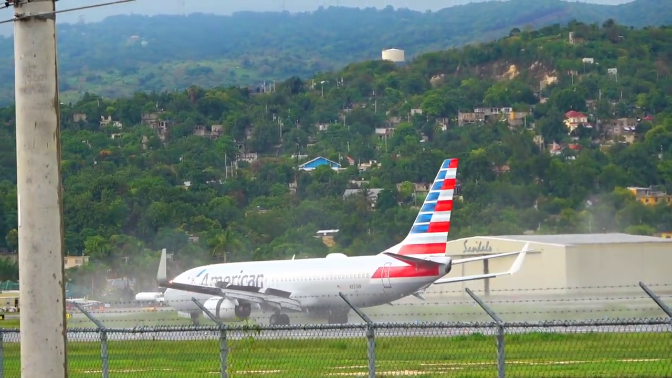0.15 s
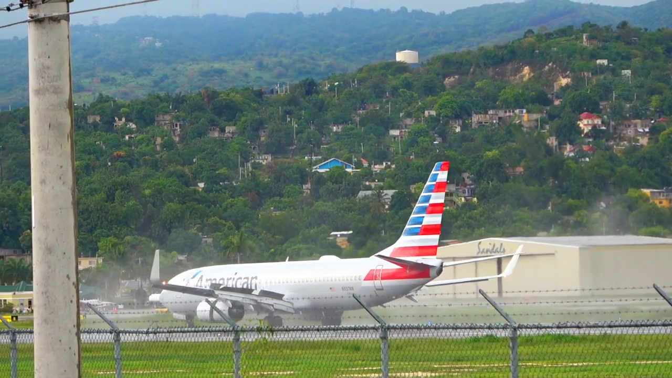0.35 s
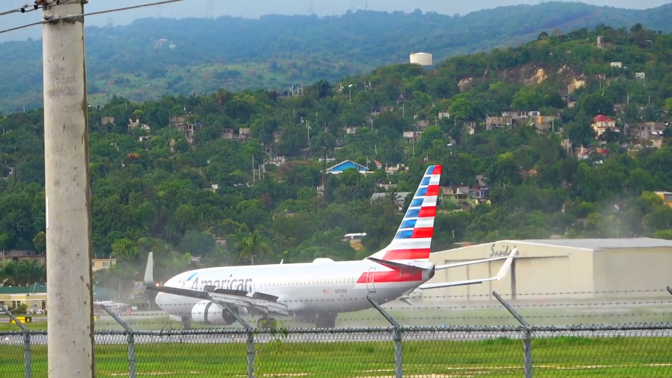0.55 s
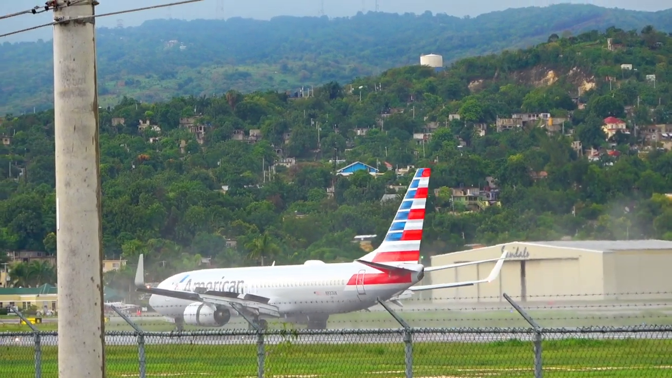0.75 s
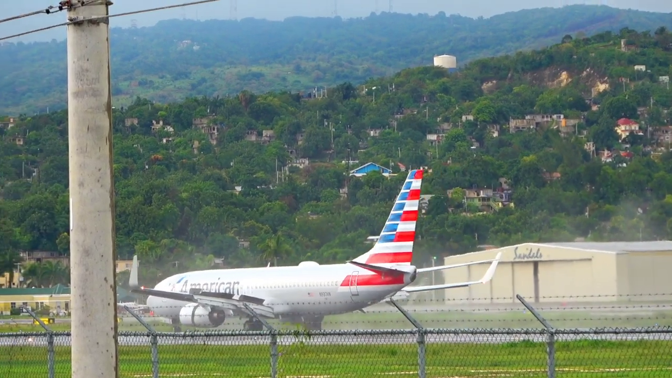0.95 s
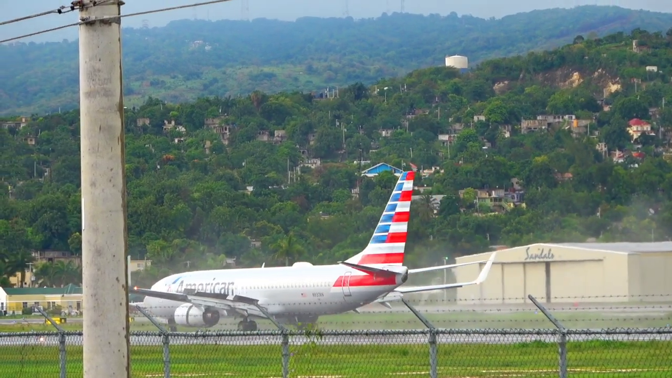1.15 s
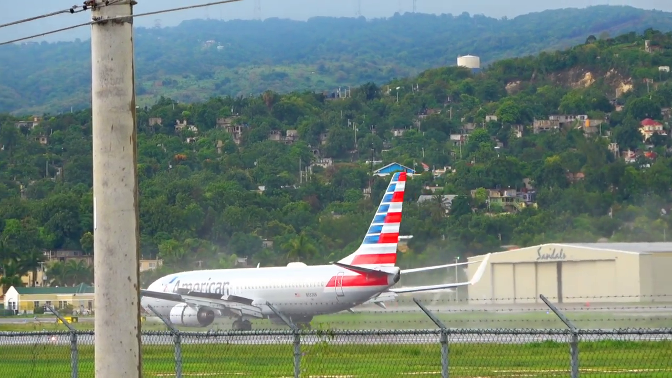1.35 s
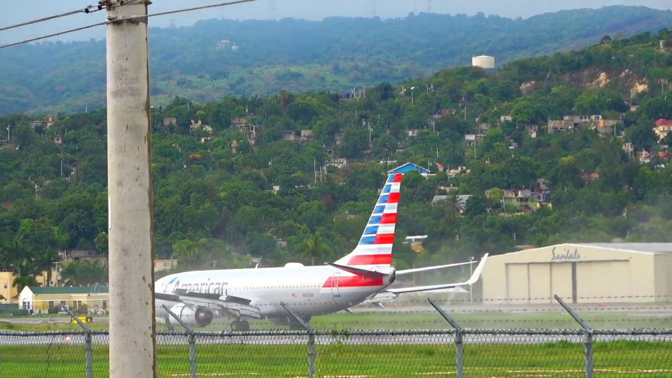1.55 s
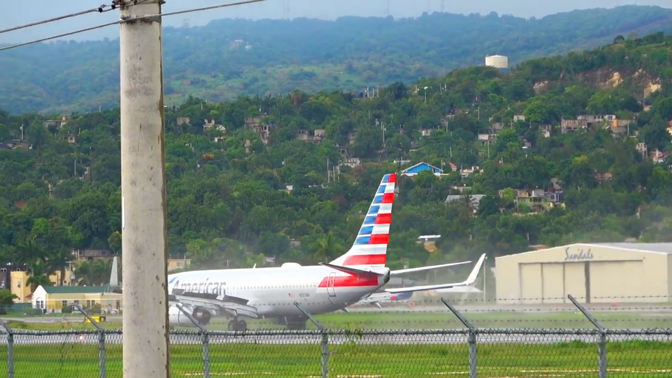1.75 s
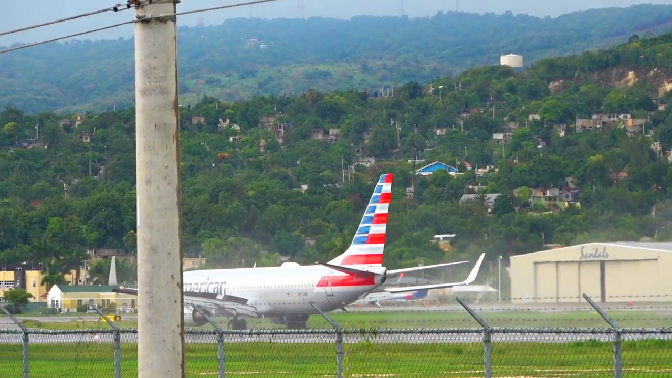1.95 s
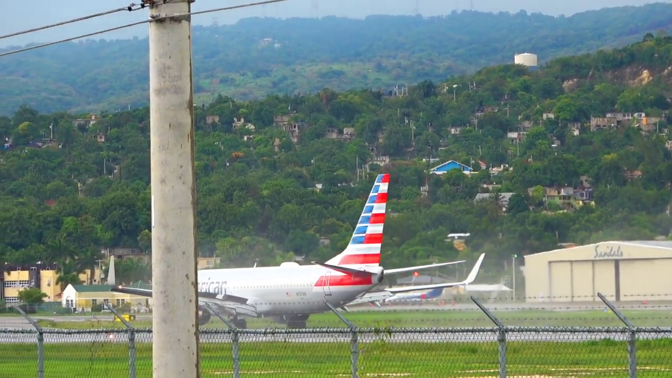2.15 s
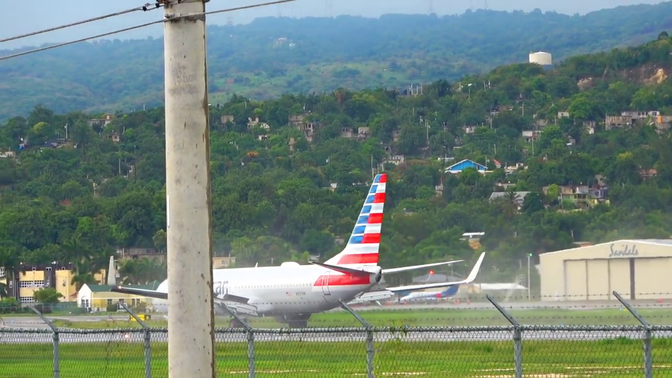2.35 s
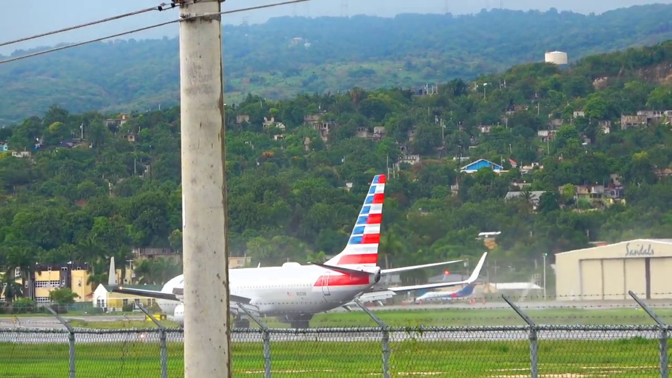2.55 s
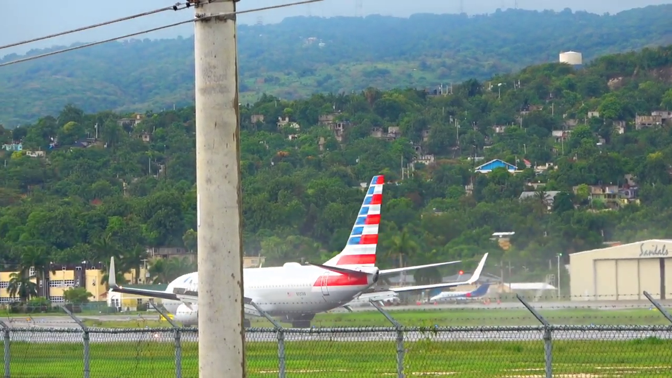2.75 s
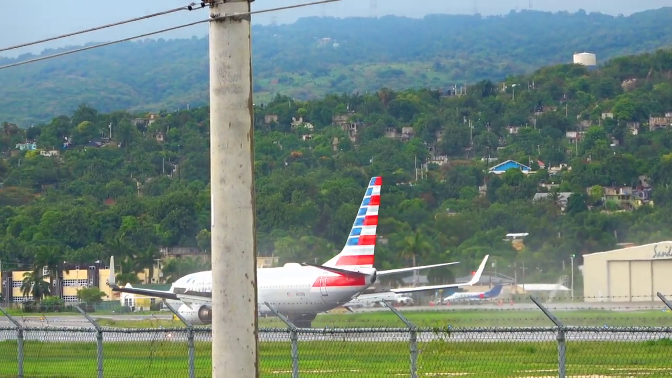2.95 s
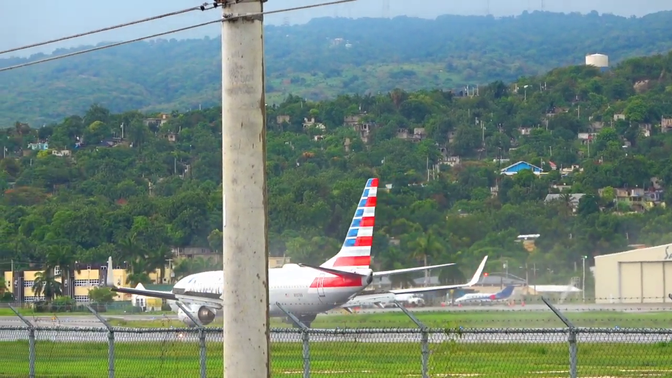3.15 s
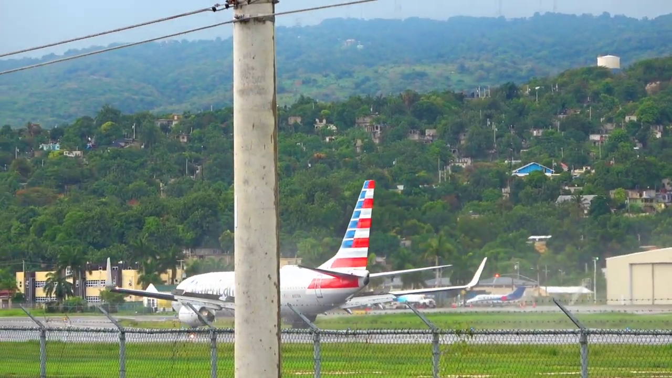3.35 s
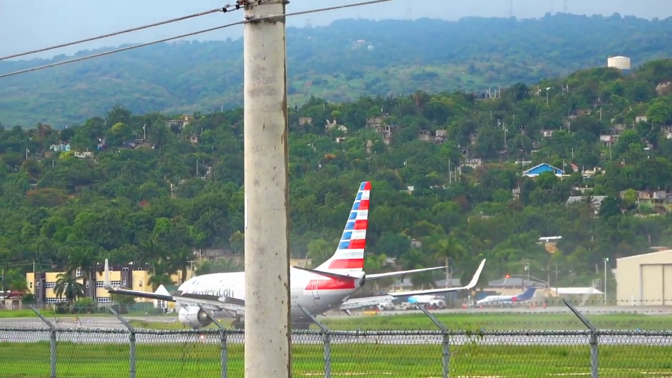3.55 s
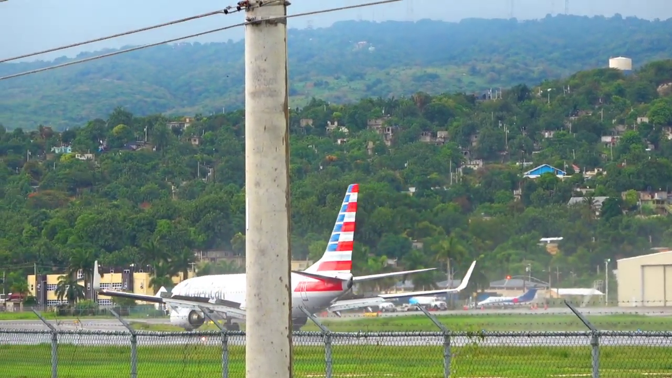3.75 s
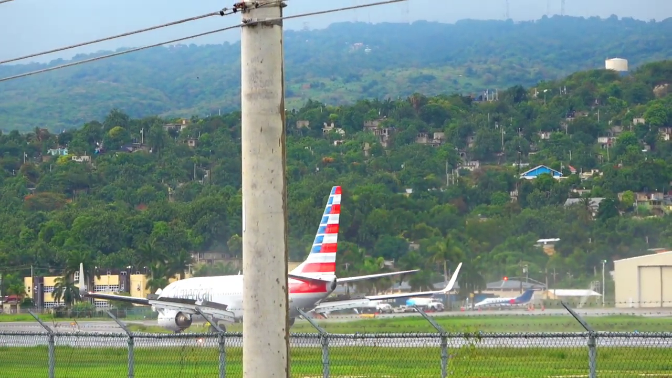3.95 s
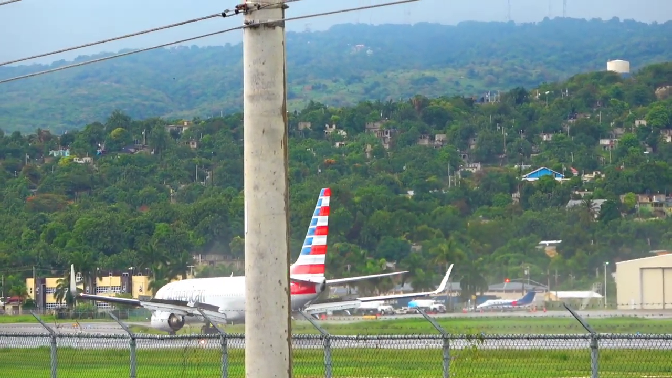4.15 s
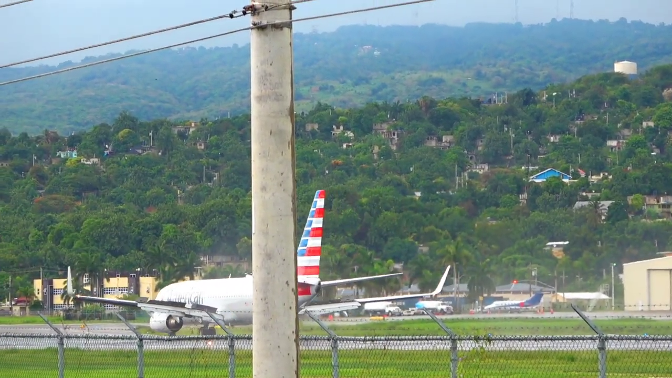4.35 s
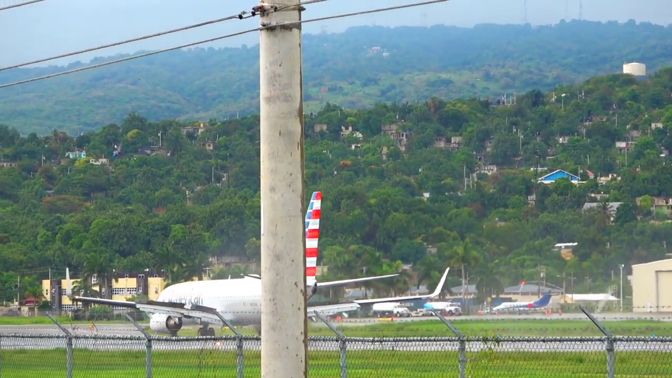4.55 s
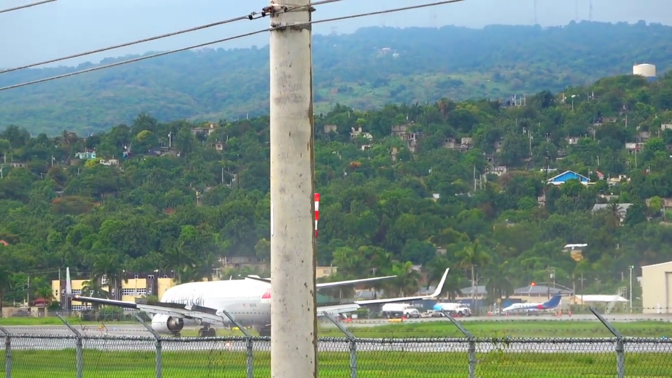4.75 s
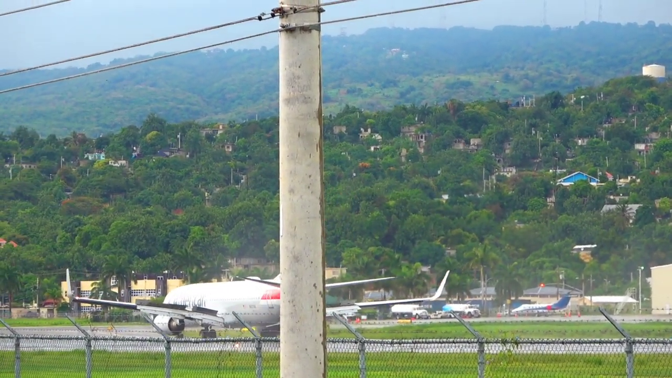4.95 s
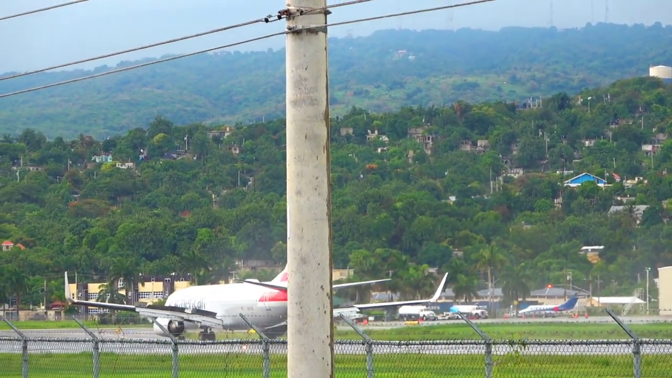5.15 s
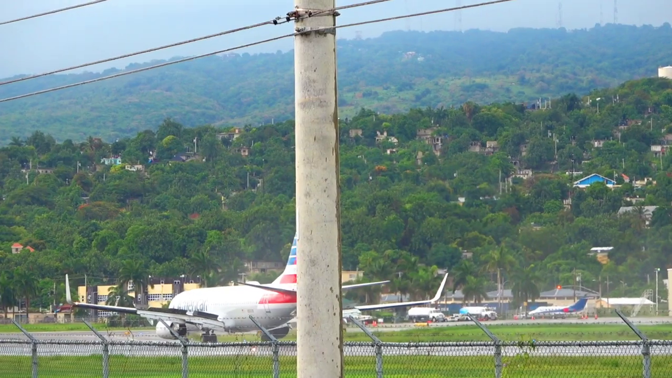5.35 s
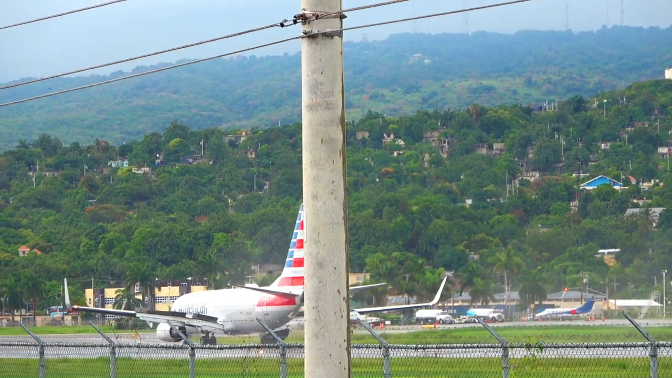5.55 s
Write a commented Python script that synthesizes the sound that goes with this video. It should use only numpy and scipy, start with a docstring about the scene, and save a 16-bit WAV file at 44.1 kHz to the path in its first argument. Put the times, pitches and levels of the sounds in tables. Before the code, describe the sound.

Distant, wide-open jet exhaust noise, loudest at the start: deep rumble, hollow mid roar and airy hiss with a trace of spray. After about two seconds it weakens, swelling and wavering, while thin engine tones glide downward. Near the end brief hissy flares surface over the remaining rumble. An outdoor handheld-style microphone picks up one small click and four muffled bumps; no echo, near-central image.

```python
"""A jet airliner rolls away down a wet runway in reverse thrust, heard across grass from beyond the fence.
Its exhaust is six bands of turbulent noise, hollowed near 450 Hz by the ground reflection, that fade as the
engines spool down; moving air lifts or holds back parts of it. Blade tones sink within the fading hiss, and
late bursts of narrow-band noise flare up. Close by, the microphone takes one tiny tick and four soft bumps,
damped modes of its housing, over the steady noise of an open field and a faint even self-noise."""
import sys
import numpy as np
from scipy import signal
from scipy.fft import rfft, irfft
from scipy.io import wavfile
from scipy.ndimage import uniform_filter1d

SR = 44100
rng = np.random.default_rng(int(sys.argv[2]) if len(sys.argv) > 2 else 0)


def dump(signal):
    """Clip the signal to [-1, 1] and save it as 16-bit WAV at the path in sys.argv[1]."""
    limited = np.clip(np.atleast_2d(signal).T, -1, 1)
    pcm = np.round(limited * 32767).astype(np.int16)
    wavfile.write(sys.argv[1], SR, pcm)


N = 251370
TIME = np.arange(N) / SR   # s
FREQUENCY = np.fft.rfftfreq(N, 1 / SR)   # Hz
OCTAVE = np.log2(np.maximum(FREQUENCY, 1))   # octaves above 1 Hz

# Steady background of the open airfield: frequency_hz, density_db (per Hz, relative)
FIELD_SPECTRUM = [(20, -19), (35, 0.5), (60, 2.5), (130, -4.5), (250, -4), (380, -5), (450, -11.5),
                  (590, -2.5), (680, -10), (1200, -22.5), (2000, -32), (2900, -24), (4000, -30)]
# The microphone's own noise: frequency_hz, density_db (per Hz, relative)
SELF_NOISE_SPECTRUM = [(100, -2.5), (5000, 2.5), (8000, 3), (11000, 5), (15000, 3), (16000, -2)]
# Tiny sharp tick: start_s, level_db (before its envelope)
TICK_EVENT = (1.4894, -24.5)
# Colour of the tick: frequency_hz, density_db (per Hz, relative)
TICK_SPECTRUM = [(4000, -2), (5500, 1.5), (6600, 3), (8000, -6), (10200, -9), (13000, -13), (14500, -27)]
# Soft bumps on the housing: start_s, level_db (before the low-pass), contact_hz, pitch_ratio
BUMP_EVENTS = [(2.4927, -14.5, 300, 1.0), (2.9655, -20, 300, .8), (4.8114, -19.5, 560, 1.5),
               (5.1210, -19.5, 1250, 1.06)]
# Modes of the housing: frequency_hz (before pitch_ratio), level_db, t60_s
HOUSING_MODES = [(185, -3.5, .042), (700, 3.5, .0062), (240, -7, .032), (1250, -8, .004)]
# Stereo width of the far turbulence: frequency_hz, side_minus_mid_db
STEREO_WIDTH = [(30, -24), (100, -26), (280, -40.5), (480, -15.5), (1000, -27.5), (2400, -20), (4400, -36),
                (7000, -16), (10000, -2.5), (16000, -10.5)]
# Late bursts of banded hiss: centre_s, half_length_s (to 1/e), level_db
FLARE_BURSTS = [(4.91, .065, -56.5), (5.005, .05, -53.5), (5.12, .07, -57)]
# Bands in which the hiss flares: centre_hz, width_hz, level_db (relative)
FLARE_HISS_BANDS = [(1900, 120, 0), (2260, 170, 1), (2860, 70, 1), (3050, 45, -2), (3320, 70, -3),
                    (3560, 70, -6), (3870, 80, -4), (4060, 50, -5), (4350, 260, -6)]
# Broadband hiss of the fan intakes: frequency_hz, density_db (per Hz, relative)
INTAKE_SPECTRUM = [(3000, -12.5), (4300, -1), (5200, -10.5), (6300, -9.5), (7300, -14.5), (8200, -16.5)]
# Unequal fan speeds and a fainter tone above: ratio (to the blade tone), level_db (relative)
FAN_TONE_RATIOS = [(.998, 0), (1.011, -4), (1.048, -7)]
# The fans' tone comes and goes as the airliner rolls on: time_s, level_db
FAN_LEVEL_CURVE = [(0, -69), (2.6, -73), (2.95, -66.5), (3.3, -67), (3.55, -70), (3.8, -68.5), (4.0, -63.5),
                   (4.15, -64), (4.25, -68.5), (4.6, -69.5), (4.8, -72), (5.1, -73), (5.4, -71), (5.7, -76)]
# Level of the turbine's tone: time_s, level_db
TURBINE_LEVEL_CURVE = [(0, -76), (3.65, -81), (3.82, -75), (4.0, -83), (4.8, -85), (5.0, -79), (5.35, -78),
                       (5.7, -83)]
# Colours of the exhaust's layers, low to high: frequency_hz, density_db (per Hz, relative)
RUMBLE_SPECTRUM = [(20, -32.5), (40, -27), (60, -8), (85, -4.5), (115, 0), (150, 1), (195, -2.5),
                   (235, -17), (300, -22)]
BUFFET_SPECTRUM = [(150, -30.5), (205, -1), (245, 1.5), (280, 3), (315, -3), (360, -10), (405, -31.5),
                   (445, -43)]   # before the shift in pitch
ROAR_SPECTRUM = [(250, -24), (360, 3.5), (445, -9), (510, -3), (560, 0.5), (650, -3.5), (790, 0.5),
                 (900, -2), (1030, 1), (1270, -1), (1450, -8), (2000, -24.5), (3200, -41.5)]
RUSH_SPECTRUM = [(900, -38.5), (1250, -3), (1450, 3.5), (1750, 3.5), (2050, 0.5), (2400, -3), (2750, -9),
                 (3300, -29)]
HISS_SPECTRUM = [(1800, -16), (2550, -5), (2900, 2.5), (3300, -1.5), (4000, -0.5), (4700, -3.5),
                 (5400, -11.5), (6800, -14.5), (8000, -32)]
SPRAY_SPECTRUM = [(4000, -3.5), (5400, 8), (6800, -3), (8000, -7.5), (9200, -18), (11000, -26.5),
                  (15000, -39)]
# Moving air favours or holds back part of the exhaust's sound:
# centre_s, half_length_s (to 1/e), gain_db (before flutter), centre_hz, reach_octaves (either side, to 1/e)
AIR_SWELLS = [(0.006, 0.077, 2.5, 180, 11), (0.204, 0.13, 2.5, 1500, 1.8), (0.506, .1, -1, 1800, 1.8),
              (0.633, 0.045, 9.5, 200, 0.67), (0.905, 0.026, 7.5, 120, 0.86), (1.06, 0.094, -7, 116, 0.56),
              (1.1, 0.0088, 4, 220, 1.1), (1.37, .13, -5, 413, 0.34), (1.465, 0.045, 7.5, 1660, 0.27),
              (1.66, 0.2, 1.5, 3000, 0.75), (2.002, 0.79, 3, 1120, 1.52), (1.98, 0.032, 1.5, 1900, 0.44),
              (1.934, 0.29, 6, 185, 0.34), (2.666, 0.33, 9, 342, 0.73), (3.3, 0.22, 4.5, 257, 0.28),
              (3.382, 0.38, 6.5, 634, 0.53), (3.4, 0.35, 3, 6000, 0.88), (3.452, 0.61, 2, 2060, 0.93),
              (3.76, 0.026, 10, 170, 0.71), (3.946, 0.32, 14, 259, 0.37), (4.06, 0.04, 3.5, 1800, 0.89),
              (4.1, .1, 4.5, 530, 0.34), (4.45, 0.28, -1.5, 2300, 2.1), (4.986, 0.14, 3.5, 900, 0.88),
              (4.98, .06, 6, 265, .4), (5.0, 0.23, 4.5, 3280, 0.74)]

# The throttles close and the fans coast from full reverse towards idle.
THROTTLE_BACK_S, SPOOL_DOWN_S = 1.6, 2.0
FAN_FULL_HZ, FAN_IDLE_HZ = 5860, 3400   # blade tone at those two speeds
TURBINE_HZ, TURBINE_SAG_HZ_PER_S = 7735, 219
WHINE_FLUTTER_DB, FLARE_FLICKER_DB = 2.0, 2.5   # rms
INTAKE_DB = -67.5
BUFFET_RATIO, BUFFET_POWER = 1.03, .35   # pitch ratio at full reverse; power of fan speed by which it sinks
SWELL_FLUTTER, SWELL_FLUTTER_PER_S = .1, 16   # rms share of a swell's dB; rate
CUTOFF_HZ = 15400


def from_db(db):
    """Amplitude is ten to the power of the level over twenty."""
    return 10 ** (np.asarray(db) / 20)


def rms_one(x):
    """Dividing by the root mean square gives unit power."""
    return x / np.sqrt(np.mean(x ** 2) + 1e-20)


def in_time(rows):
    """Linear interpolation joins rows of time and value."""
    return np.interp(TIME, *np.transpose(rows))


def hump(x, centre, width):
    """A Gaussian bell of height 1 falls to 1/e at width from its centre."""
    return np.exp(-((x - centre) / width) ** 2)


def colour(x, points):
    """Spectral shaping: dB joined along log frequency, falling 36 dB per octave faster beyond the ends."""
    hz, db = np.transpose(points)
    log_hz = np.log2(hz)
    beyond = np.abs(OCTAVE - np.clip(OCTAVE, log_hz[0], log_hz[-1]))
    gain_db = np.interp(OCTAVE, log_hz, db) - 36 * beyond
    return irfft(rfft(x) * from_db(gain_db), N)


def drift(rate):
    """Low-pass noise of unit rms: a random change about rate times a second."""
    noise = rfft(rng.standard_normal(N))
    return rms_one(irfft(noise / (1 + (FREQUENCY / rate) ** 2), N))


def pan(x, left_db):
    """An interchannel level difference leans a sound to the left."""
    return x * from_db(np.array([[.5], [-.5]]) * left_db)


def background(spectrum, level_db, spread):
    """Stationary noise: channels share one part, and spread weights the part each has to itself."""
    noise = rng.standard_normal(N) + spread * rng.standard_normal((2, N))
    return from_db(level_db) * rms_one(colour(noise, spectrum))


def self_noise():
    """The microphone's own noise is a stationary random process, heard as faint even hiss."""
    return background(SELF_NOISE_SPECTRUM, level_db=-76.5, spread=.3)


def open_field():
    """The open airfield is a steady diffuse noise with most of its power at low frequency."""
    return pan(background(FIELD_SPECTRUM, level_db=-45.5, spread=0.18), left_db=-2.0)


def tick(decay_s):
    """An impulsive contact: high-frequency noise under a linear rise and exponential decay."""
    start_s, level_db = TICK_EVENT
    age = np.maximum(TIME - start_s, 0) / decay_s
    crack = rms_one(colour(rng.standard_normal(N), TICK_SPECTRUM))
    return from_db(level_db) * age * np.exp(-age) * crack


def bumps():
    """Modal decay: each soft contact rings the damped housing, and its stiffness sets a low-pass."""
    out = np.zeros(N)
    for start_s, level_db, contact_hz, pitch in BUMP_EVENTS:
        age = np.maximum(TIME - start_s, 0)
        ring = np.zeros(N)
        for k, (hz, db, t60_s) in enumerate(HOUSING_MODES):
            envelope = from_db(db - 60 * age / t60_s)
            ring += (-1) ** k * envelope * np.sin(2 * np.pi * pitch * hz * age)
        lowpass = signal.butter(2, contact_hz, "low", fs=SR, output="sos")
        out += from_db(level_db) * signal.sosfilt(lowpass, ring + 1e-18)   # offset avoids denormals
    return pan(out, left_db=-2.5)


def eddies(spectrum, level_db, left_db, speed=1):
    """Turbulent noise, nearly alike in both channels; faster flow shifts its spectrum upward."""
    mid, side = colour(rng.standard_normal((2, N)), spectrum)
    stereo = mid + colour(side, STEREO_WIDTH) * [[1], [-1]]
    place = np.cumsum(speed * np.ones(N))   # reading the noise faster raises its pitch
    both = np.array([np.interp(place, np.arange(N), x, period=N) for x in stereo])
    power = uniform_filter1d(np.mean(both ** 2, axis=0), size=SR // 5)   # levelled over 0.2 s
    return pan(both, left_db) * from_db(level_db) / np.sqrt(power)


def whine(hz, wander_hz, skirt_hz, skirt_db):
    """Tone scattering: a line modulated in frequency and level stands on a noise skirt; rms 1."""
    wander = np.exp(2j * np.pi * np.cumsum(wander_hz * drift(25)) / SR)
    core = from_db(WHINE_FLUTTER_DB * drift(6)) * wander
    skirt = (drift(skirt_hz) + 1j * drift(skirt_hz)) / np.sqrt(2)
    carrier = np.exp(2j * np.pi * np.cumsum(hz * np.ones(N)) / SR)
    return rms_one(np.real((core + from_db(skirt_db) * skirt) * carrier))


def flares():
    """Narrow-band noise under Gaussian bursts: hiss flares up while each band flickers by itself."""
    level = sum(from_db(db) * hump(TIME, centre_s, length_s) for centre_s, length_s, db in FLARE_BURSTS)
    bands = np.zeros(N)
    for hz, width_hz, db in FLARE_HISS_BANDS:
        flicker = from_db(db + FLARE_FLICKER_DB * drift(12))
        bands += flicker * whine(hz, wander_hz=width_hz, skirt_hz=width_hz, skirt_db=10)
    return pan(level * rms_one(bands), left_db=-1.0)


def fan_speed():
    """Exponential relaxation: speed as a share of full reverse is held, then coasts towards idle."""
    idle = FAN_IDLE_HZ / FAN_FULL_HZ
    coasting_s = np.maximum(TIME - THROTTLE_BACK_S, 0)
    return idle + (1 - idle) * np.exp(-coasting_s / SPOOL_DOWN_S)


def intake_hiss():
    """Broadband noise of the fan intakes keeps its level, and so is still there at idle."""
    return eddies(INTAKE_SPECTRUM, INTAKE_DB, left_db=1.5)


def fan_whine():
    """Blade-passing tones are proportional to fan speed, so they sink as the fans coast."""
    fan_hz = FAN_FULL_HZ * fan_speed()
    fans = np.zeros(N)
    for ratio, db in FAN_TONE_RATIOS:
        fans += from_db(db) * whine(ratio * fan_hz, wander_hz=9, skirt_hz=300, skirt_db=-4)
    return from_db(in_time(FAN_LEVEL_CURVE)) * fans


def turbine_whine():
    """A rotational tone follows its rotor's speed; the turbine's sinks linearly in time."""
    hz = TURBINE_HZ - TURBINE_SAG_HZ_PER_S * TIME
    return from_db(in_time(TURBINE_LEVEL_CURVE)) * whine(hz, wander_hz=12, skirt_hz=260, skirt_db=-1)


def jet_level(start_db, speed_power, recede_db_per_s):
    """Jet-noise power law: power goes as a power of fan speed, with a steady loss in dB for distance."""
    return start_db + 10 * speed_power * np.log10(fan_speed()) - recede_db_per_s * TIME


def moving_air(x):
    """Time-varying transmission: each swell lifts or lowers one spectral region, then lets it go."""
    flutter = 1 + SWELL_FLUTTER * drift(SWELL_FLUTTER_PER_S)
    spectrum = rfft(x)
    out = x.copy()
    for centre_s, length_s, db, hz, reach in AIR_SWELLS:
        region = irfft(spectrum * hump(OCTAVE, np.log2(hz), reach), N)
        gain = from_db(db * flutter * hump(TIME, centre_s, length_s))
        out += (gain - 1) * region
    return out


def exhaust():
    """Turbulent mixing: large eddies rumble and buffet below the ground dip, small ones roar and hiss above."""
    rumble_db = jet_level(start_db=-23.5, speed_power=1.3, recede_db_per_s=3.5)
    buffet_db = jet_level(start_db=-24.0, speed_power=5.8, recede_db_per_s=3.5)
    roar_db = jet_level(start_db=-27.5, speed_power=5.39, recede_db_per_s=2.0)
    rush_db = jet_level(start_db=-31.5, speed_power=7.4, recede_db_per_s=2.5)
    hiss_db = jet_level(start_db=-37.5, speed_power=6.65, recede_db_per_s=3.5)
    spray_db = jet_level(start_db=-49.0, speed_power=5.3, recede_db_per_s=4.0)   # blown runway water
    gusts = drift(9.7)   # moving air makes the far sound flutter
    buffet_speed = BUFFET_RATIO * fan_speed() ** BUFFET_POWER
    rumble = eddies(RUMBLE_SPECTRUM, rumble_db + .6 * drift(7), left_db=0.2)
    buffet = eddies(BUFFET_SPECTRUM, buffet_db + .6 * drift(39), left_db=-0.5, speed=buffet_speed)
    roar = eddies(ROAR_SPECTRUM, roar_db + 0.28 * gusts, left_db=-1.05)
    rush = eddies(RUSH_SPECTRUM, rush_db + 0.19 * drift(8.2), left_db=0.0)
    hiss = eddies(HISS_SPECTRUM, hiss_db + 0.5 * gusts, left_db=1.5)
    spray = eddies(SPRAY_SPECTRUM, spray_db, left_db=-1.2)
    return moving_air(rumble + buffet + roar + rush + hiss + spray)


def scene():
    """Superposition: steady backgrounds, close contacts and the far airliner add linearly."""
    surroundings = self_noise() + open_field()
    contacts = tick(decay_s=0.00058) + bumps()
    engines = intake_hiss() + fan_whine() + turbine_whine()
    airliner = flares() + engines + exhaust()
    return surroundings + contacts + airliner


def record(dry):
    """Band limitation: a zero-phase elliptic low-pass cuts the top steeply."""
    lowpass = signal.ellip(10, .05, 70, CUTOFF_HZ, fs=SR, output="sos")
    return signal.sosfiltfilt(lowpass, dry)


dry = scene()
out = record(dry)
dump(out)
```